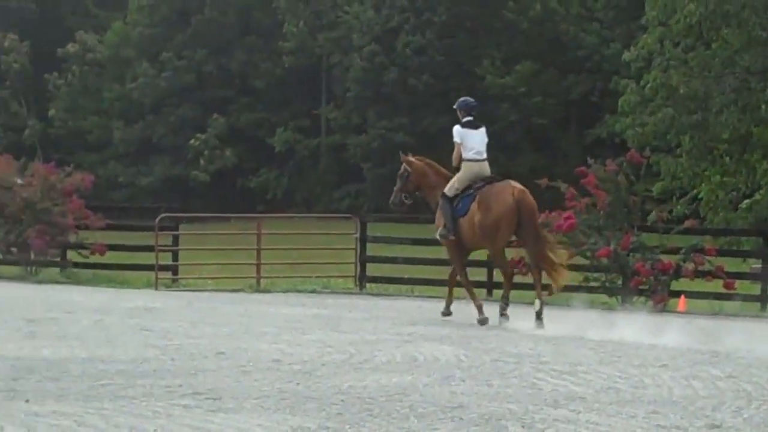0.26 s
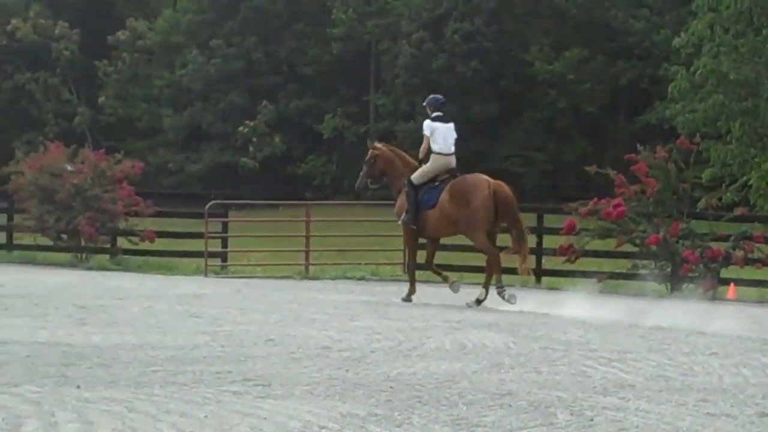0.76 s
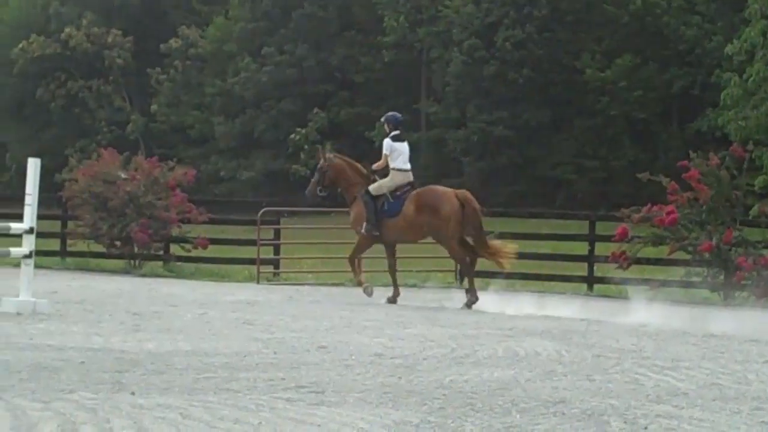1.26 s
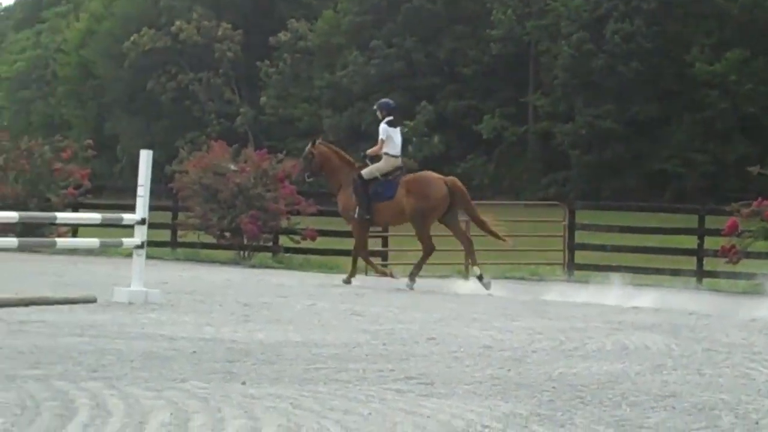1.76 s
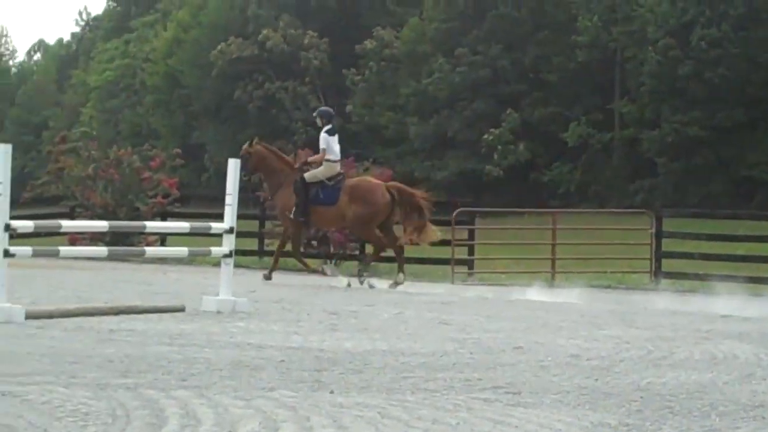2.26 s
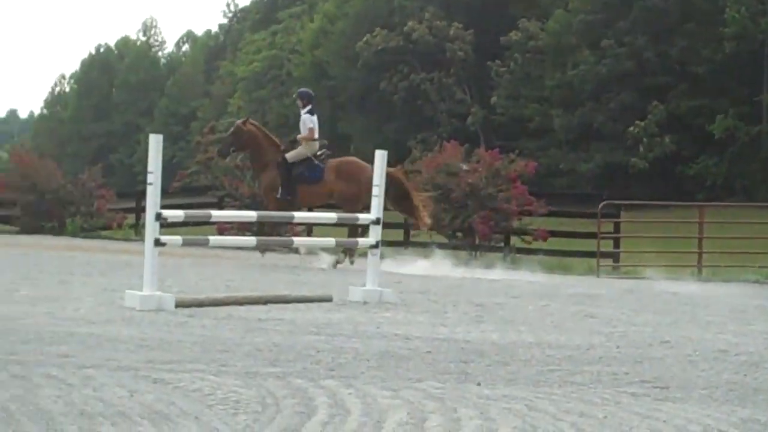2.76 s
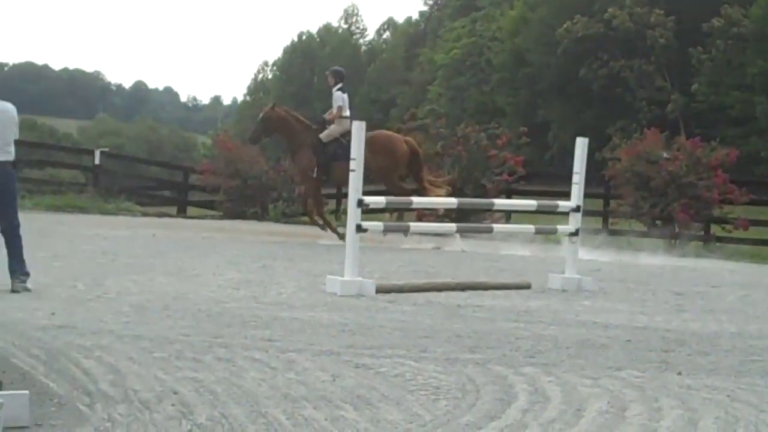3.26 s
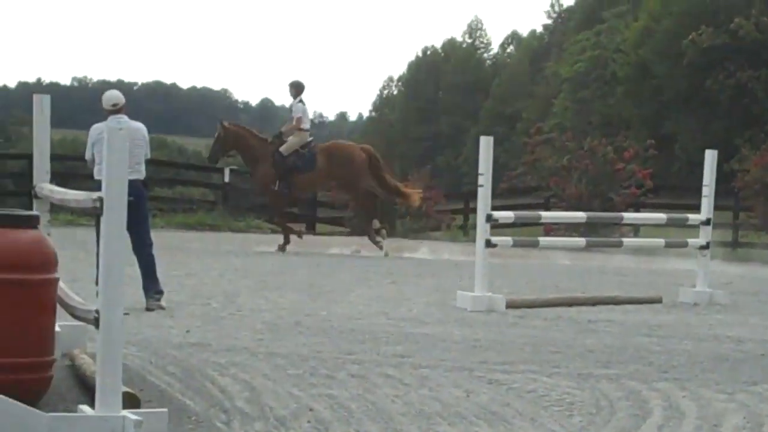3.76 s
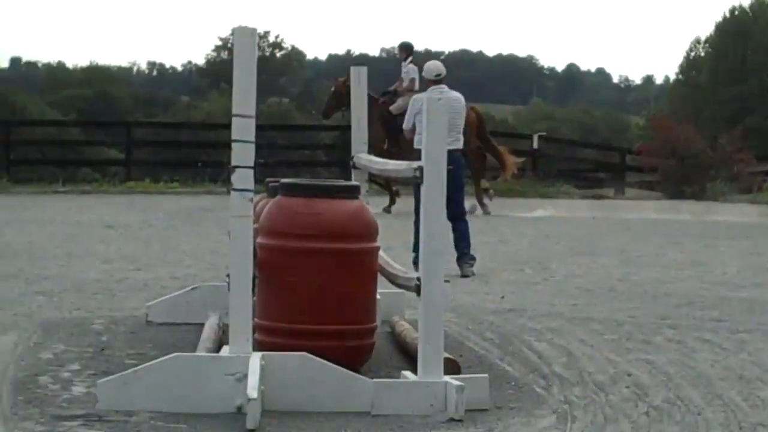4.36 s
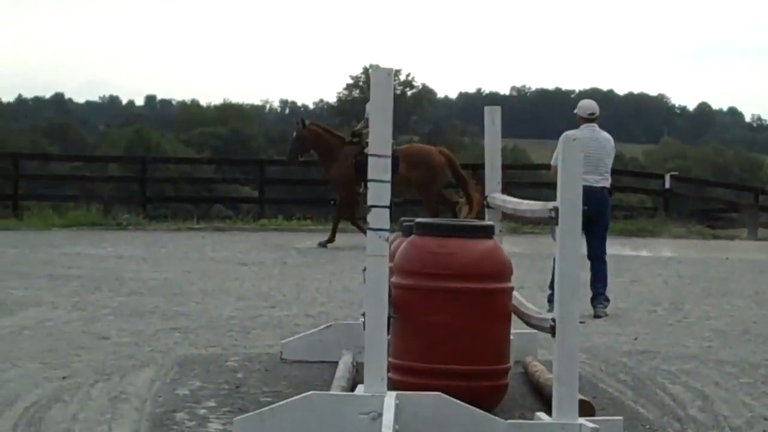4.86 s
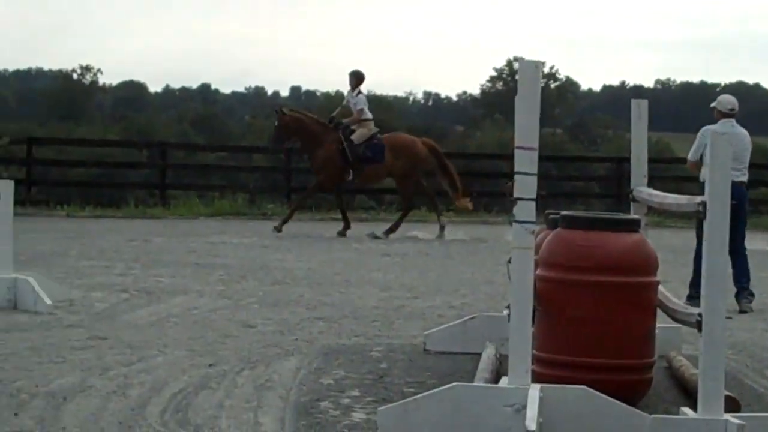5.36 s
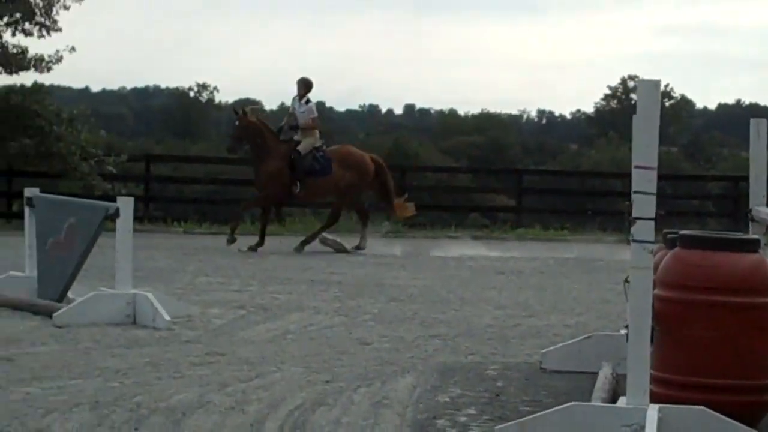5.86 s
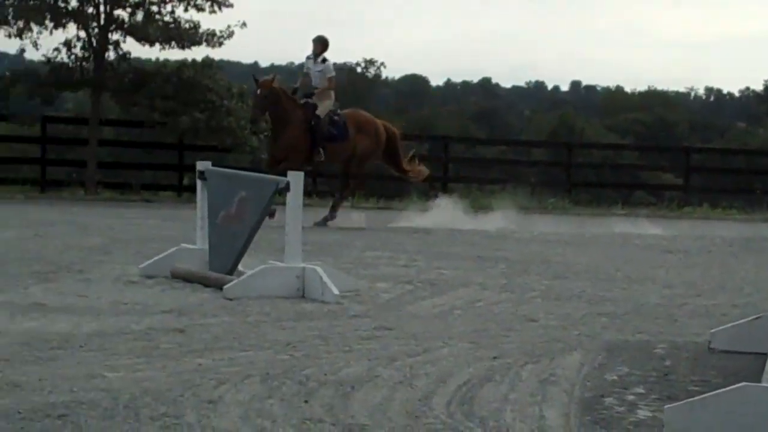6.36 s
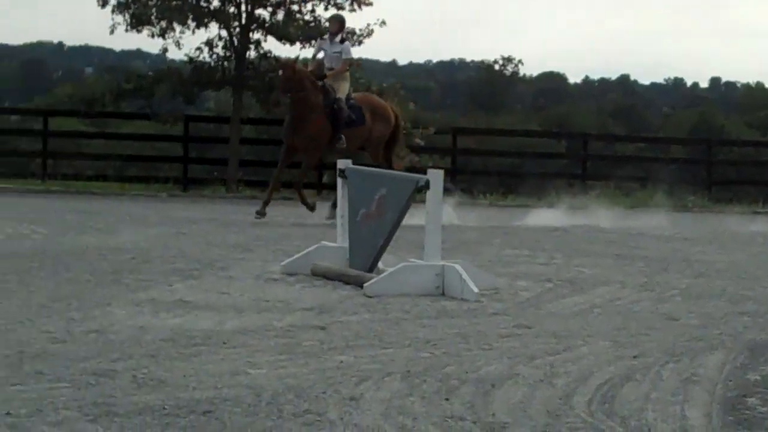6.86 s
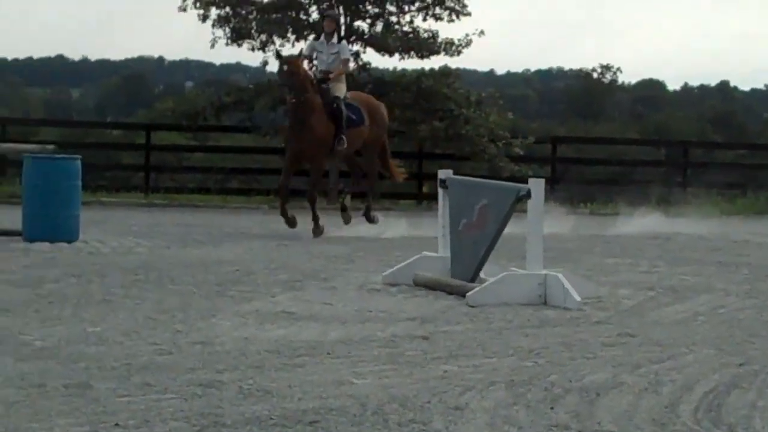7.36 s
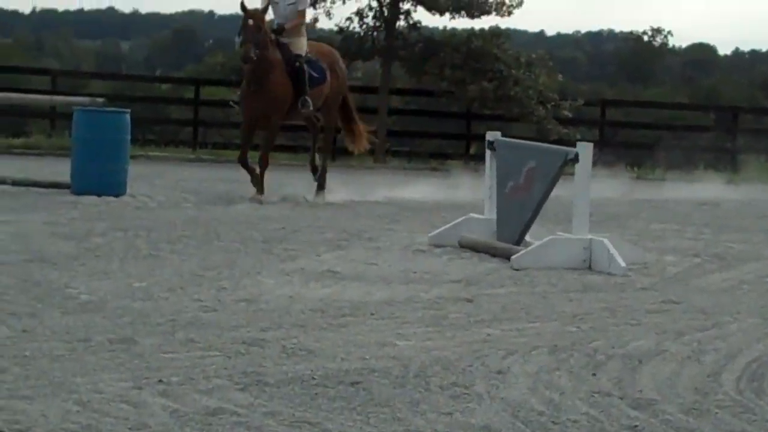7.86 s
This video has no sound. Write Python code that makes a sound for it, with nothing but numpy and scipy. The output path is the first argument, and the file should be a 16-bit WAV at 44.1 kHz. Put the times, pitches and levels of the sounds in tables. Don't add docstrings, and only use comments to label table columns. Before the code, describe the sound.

A distant horse crosses sand and gravel with quiet, irregular hoofbeats, small stone ticks and soft sprays of grit. High insect hiss and thin cricket chirps stay constant over dull far-off noise and a faint low motor hum. One startlingly sharp pebble crack comes at the middle, weaker clicks two seconds later, then a short leather squeak. Open-air stereo pickup with little puffs of wind on the microphone.

```python
import sys
import numpy as np
from scipy import signal
from scipy.fft import rfft, irfft, next_fast_len
from scipy.io import wavfile
from scipy.ndimage import map_coordinates

SR = 44100
rng = np.random.default_rng(int(sys.argv[2]) if len(sys.argv) > 2 else 0)


def pcm_store(signal):
    levels = np.round(np.clip(np.atleast_2d(signal), -1, 1) * 32767)
    wavfile.write(sys.argv[1], SR, levels.astype(np.int16).T)


def ratio_of_db(decibels):
    return 10 ** (np.asarray(decibels, float) / 20)


N = 357827
TIME = np.arange(N) / SR
TOP_HZ = 14190


def unit(x):
    return x / np.sqrt(np.mean(x ** 2) + 1e-20)


def along(points, hz):
    f, v = np.transpose(points)
    return np.interp(np.log(hz + 1), np.log(f + 1), v)


def wobble(rate):
    return map_coordinates(rng.standard_normal(int(N * rate / SR) + 4), [np.arange(N) * rate / SR])


def filtered(x, response):
    m = next_fast_len(N + SR // 2, True)
    return irfft(rfft(x, m) * response(np.fft.rfftfreq(m, 1 / SR)), m)[..., :N]


def ring(f, hz, width_hz):
    return 1j * f * width_hz / (hz * hz - f * f + 1j * f * width_hz)


# f/Hz, left-right likeness/1
LIKENESS = [(30, -0.36), (60, 0.56), (120, 0.73), (700, 0.48), (2000, 0.38), (3500, 0.08), (4300, -0.37),
            (7500, -0.31), (9000, 0.04)]


def rush(gain):
    def turn(hz):
        return np.arccos(np.clip(along(LIKENESS, hz), -1, 1)) / 2

    noise = rng.standard_normal((2, N))
    mid, side = filtered(noise, lambda hz: [np.cos(turn(hz)), np.sin(turn(hz))])
    return unit(filtered(np.array([mid + side, mid - side]), gain))


def add(track, s, sound):
    part = track[..., round(s * SR):][..., :sound.shape[-1]]
    part += sound[..., :part.shape[-1]]


def tilted(noise, db_per_octave, low_hz):
    hz = np.fft.rfftfreq(noise.shape[-1], 1 / SR) + 1
    gain = ratio_of_db(db_per_octave * np.log2(hz / 2400))
    gain = gain / (1 + (low_hz / hz) ** 4) / np.sqrt(1 + (hz / 11000) ** 4)
    return irfft(rfft(noise) * gain, noise.shape[-1])


def echoes(x, t60, gap):
    t = np.arange(SR // 3) / SR
    tail = rng.standard_normal((2, len(t))) * ratio_of_db(-60 * t / t60) * (t > gap)
    return signal.fftconvolve(np.atleast_2d(x), tail / np.linalg.norm(tail[0]), axes=1)[:, :N]


def blows(rows, t60, rise, trim_db, rough, ratio=1):
    usual_db, shorter_per_db = -46.5, 0.07
    out, t = np.zeros(N), np.arange(SR // 8) / SR
    for s, db, hz in rows:
        walk = np.cumsum(rng.standard_normal(len(t)))
        shake = rough * walk / np.sqrt(SR / (ratio * hz))
        fall_db = 60 * t / t60 * np.exp(shorter_per_db * (db - usual_db))
        envelope = ratio_of_db(db + trim_db - fall_db) * (1 - np.exp(-t / rise)) ** 2
        add(out, s, envelope * np.sin(2 * np.pi * ratio * hz * t + shake))
    return out


# f/Hz, spectral level/dB per Hz
FAR_NOISE = [(15, -38), (25, -53.5), (64, -6), (119, 0.5), (228, -1.5), (349, -8.5), (666, -4), (1390, -6),
             (1660, -5), (3110, -4.5), (3720, -5.5), (4250, -0.5), (5200, -8), (6760, -92), (11400, -120)]
# t/s, level/dB
MOTOR_LOAD = [(0, -71.5), (1.1, -78), (2.4, -66.5), (3.0, -74), (3.5, -67.5), (3.9, -92), (5.6, -68),
              (6.9, -76.5), (7.3, -71), (8.11, -67.5)]
# t/s, level over the breeze/dB
WIND_PUFFS = [(.18, 11.5), (1.1, 12), (1.5, 8), (6.1, 11), (6.7, 3), (7.77, 15)]


def outdoors():
    lull_db = -1.5 * np.exp(-((TIME - 4.93) / 0.59) ** 2)
    air = ratio_of_db(-58.5 + lull_db + 1.3 * wobble(9)) * rush(lambda f: ratio_of_db(along(FAR_NOISE, f)))

    motor_db = np.interp(TIME, *np.transpose(MOTOR_LOAD)) + 0.81 * wobble(3.77) - 0.5
    motor = ratio_of_db(motor_db) * rush(lambda f: abs(ring(f, 108.8, 21)) ** 2)

    breeze_db = -77.5 + 12 * np.exp(-TIME / 0.77) + wobble(2.4)
    for s, db in WIND_PUFFS:
        breeze_db += db * np.exp(-((TIME - s) / 0.094) ** 2)
    lumps = ratio_of_db(1.5 * np.array([wobble(7.3), wobble(8)]))
    rumble = filtered(rng.standard_normal((2, N)), lambda f: f / (f + 15) / (1 + (f / 60) ** 3))
    return air + motor + ratio_of_db(breeze_db) * unit(lumps * rumble)


# f/Hz, spectral level/dB per Hz
LEFT_CHORUS = [(4000, -16), (5200, -14), (5700, -8.5), (6400, 5), (6800, 4.5), (7200, 10.5), (7600, 11),
               (8200, 0), (9000, -3), (9900, -15.5), (10800, -10.5), (14000, -4.5)]
RIGHT_CHORUS = [(4000, -17), (5200, -15.5), (5700, -2), (6250, 9), (6700, 3), (7050, 8), (7600, 5.5),
                (8000, -6), (8700, -34), (9300, -62), (14000, -51)]
CRICKET_DB = -55.5


def cicadas():
    buzz_db = [0.88 * wobble(220) + 0.28 * wobble(25) + 0.5 * wobble(6.9) for _ in range(2)]
    hiss = rush(lambda f: ratio_of_db([along(LEFT_CHORUS, f), along(RIGHT_CHORUS, f)]))
    level_db = -47 + 2 * np.exp(-TIME / 1.4)
    return ratio_of_db(level_db) * unit(ratio_of_db(np.array(buzz_db)) * hiss)


def crickets():
    trill_phase = 2 * np.pi * np.cumsum(16.0 + 0.55 * wobble(2.0)) / SR
    depth_db = (2.0 + 0.46 * TIME) * (1 + .5 * wobble(2.0))
    trill_db = depth_db * np.sin(trill_phase) + 1.1 * wobble(40)
    near = unit(ratio_of_db(0.87 * trill_db) * rush(lambda f: abs(ring(f, 4245, 300)) ** 2))
    far = ratio_of_db(1.8 - 0.65 * TIME) * rush(lambda f: abs(ring(f, 4443, 610)) ** 2)
    return ratio_of_db(CRICKET_DB - 3.5 + 0.38 * wobble(1.15)) * (0.82 * near + 0.95 * far)


# t/s, level over the chorus/dB, f/Hz
WING_STROKES = [(1.095, 3, 4700), (1.151, 3, 4600), (1.471, 8, 4160), (1.532, 7, 4180), (1.587, 3, 4570),
                (1.647, 4, 4620), (1.708, 6, 4580), (1.981, 7, 4260), (2.052, 5, 4300), (2.996, 4, 4150),
                (3.249, 5, 4060), (4.119, 7.5, 4300), (4.46, 5, 4250), (4.76, 6, 4230), (4.82, 2, 4200),
                (4.878, 8, 4180), (5.585, 7, 4230), (5.631, 7, 4270), (5.685, 5, 4270), (6, 0, 4270),
                (6.049, 6.5, 4190), (6.102, 8, 4270), (6.581, 7, 4220), (6.639, 9, 4250), (6.75, 1, 4750),
                (6.8, 1, 4750), (6.95, 5, 4230), (6.997, 7, 4270), (7.047, 7, 4180), (7.36, 7, 4180),
                (7.418, 9, 4240), (7.452, 3, 4750), (7.473, 7, 4220), (7.502, 4, 4800), (7.793, 7.5, 4220),
                (7.839, 10, 4270), (7.867, 1, 4700), (7.898, 9, 4240), (8.032, 8, 4220)]


def wings():
    half_s, port_phase_rad = 0.0073, 1.32
    out, t = np.zeros((2, N)), np.arange(-SR // 25, SR // 25) / SR
    for s, db, hz in WING_STROKES:
        shake = .05 * np.cumsum(rng.standard_normal(len(t))) + np.array([[0], [port_phase_rad]])
        swell = ratio_of_db(CRICKET_DB + db) * np.exp(-(t / half_s) ** 2)
        add(out, s + t[0], swell * np.sin(2 * np.pi * hz * t + shake))
    return out


# t/s, length/s, first slip rate/Hz, last slip rate/Hz, level/dB
PULLS = [
    (6.305, 0.016, 388, 330, -64),
    (6.3264, 0.051, 300.6, 124.2, -55.5),
    (6.391, .002, 60, 60, -49),
    (6.405, .008, 156, 156, -52),
    (6.426, .121, 224, 160.4, -53.5),
    (6.555, .002, 60, 60, -48),
    (6.6248, 0.073, 197, 151, -54),
]
# f/Hz, width/Hz, level/dB
LEATHER_MODES = [(1160, 126, 4), (1784, 310, 6.5), (2240, 300, -3.5), (2980, 520, 7)]


def strap():
    slips = np.zeros(N)
    for s, length, first, last, db in PULLS:
        u = np.arange(round(length * SR)) / SR
        turns = np.floor(first * u + (last - first) * u * u / (2 * length))
        grip_db = -6 * np.exp(-u / .008)
        jerk_db = 6 * np.exp(-((u - .02) / .016) ** 2)
        let_go_db = -4 * (u / length) ** 6
        force_db = db + grip_db + jerk_db + let_go_db + 30 + .7 * rng.standard_normal(len(u))
        add(slips, s, np.diff(turns, prepend=-1) * ratio_of_db(force_db))

    modes = []
    for k, (hz, width, db) in enumerate(LEATHER_MODES):
        gain = (-1) ** k * ratio_of_db(db)
        modes.append(filtered(slips, lambda f: gain * ring(f, hz, width) * ring(f, hz, 2 * width)))
    tight_db = 0.5 - 33 * np.exp(-np.abs(TIME - PULLS[0][0]) / 0.022)
    dry = modes[0] * ratio_of_db(-.5 * tight_db) + modes[1] + (modes[2] + modes[3]) * ratio_of_db(tight_db)
    return dry + ratio_of_db(-11) * echoes(dry, t60=.1, gap=0.0019)


# t/s, peak level/dB, left-right level/dB, t60/s, brightness/dB per octave
PEBBLE_HITS = [
    (4.0083, -3, 1.5, 0.016, 6.5),
    (4.0124, -16.5, 2, .02, -2.5),
    (4.0244, -25, -17, .01, 9),
    (4.0617, -16.5, 13, 0.015, 8),
    (4.063, -24, 8, .01, 10.5),
    (5.335, -36, 9, 0.023, 15.5),
    (5.9586, -21, 7, .015, 7),
    (5.961, -18, 7, 0.03, 7),
    (5.9645, -23, 4, .015, 7),
    (5.9963, -39, 0, .02, 2),
]
# f/Hz, level/dB, t60/s
POLE_MODES = [(3400, -5.5, 0.009), (4040, -11.5, 0.019), (1860, -17, 0.014), (6507, -9, 0.012)]


def pebbles():
    out, t = np.zeros((2, N)), np.arange(SR // 20) / SR
    for s, db, pan_db, t60, tilt_db in PEBBLE_HITS:
        snap = np.exp(-((t - .0007) / 0.00015) ** 2) * np.sin(2 * np.pi * 6800 * t)
        pole = np.zeros(len(t))
        for hz, level, ring_s in POLE_MODES:
            pole += ratio_of_db(level - tilt_db - 60 * t / ring_s) * np.sin(2 * np.pi * hz * t)
        pole *= 1 - np.exp(-t / 0.00016)
        rattle = 0.09 * rng.standard_normal((2, len(t))) * ratio_of_db(-60 * t / t60) * (t > .0004)
        rattle[:, 20] += .8
        rattle = tilted(rattle, tilt_db, low_hz=1500) * (t > .0002) * (t < .04)
        pan = np.array([[.5], [-.5]]) * pan_db
        add(out, s - .0004, ratio_of_db(db - 10 + pan) * (snap + pole + rattle))
    return out


def scuffs():
    coarse = np.arange(0, N, 256) / SR
    near_kick = sum(np.exp(-((coarse - s) / 0.075) ** 2) for s, *_ in SAND_KICKS + TOE_CLIPS)
    busy = np.interp(TIME, coarse, near_kick)
    clumps = ratio_of_db(3.7 * wobble(45) + 0.64 * wobble(200))
    grains = rush(lambda f: abs(ring(f, 707, 940)) ** 2 + 1.42 * abs(ring(f, 258, 87)))
    return ratio_of_db(-65 + 3 * np.tanh(0.54 * busy)) * unit(clumps * grains)


# t/s, peak level/dB, t60/s
SAND_KICKS = [(0.1903, -47, 0.16), (0.2994, -46, 0.045), (0.4783, -47.5, 0.064), (0.5841, -47.5, 0.074),
              (0.853, -49.5, 0.066), (0.9366, -49.5, 0.14), (1.04, -45, 0.06), (1.6781, -48.5, 0.082),
              (1.85, -51.5, 0.075), (2.0342, -52, 0.096), (2.5182, -45, 0.045), (2.5594, -51.5, 0.15),
              (3.1228, -51, 0.11), (3.271, -47, 0.14), (5.0584, -54, 0.12), (5.5094, -41.5, 0.052),
              (5.6585, -47, 0.13), (5.9712, -44.5, 0.11), (6.0955, -48.5, 0.18), (6.171, -49, 0.18),
              (6.2572, -56, 0.035), (6.575, -45, 0.14), (6.987, -53, 0.047), (7.2579, -48, 0.1),
              (7.396, -47.5, 0.06), (7.4872, -49, 0.029), (7.689, -45, 0.13), (7.8336, -45, 0.12),
              (7.9394, -47.5, 0.26), (8.0621, -48.5, 0.11)]
# t/s, peak level/dB
TOE_BRUSHES = [(0.0872, -50.5), (0.246, -57), (2.55, -50), (3.73, -54), (1.1205, -50), (1.1997, -50),
               (2.607, -48), (3.338, -54), (4.1193, -53), (5.167, -57), (5.739, -62), (7.204, -54),
               (7.3127, -50), (7.8968, -49)]


def sand():
    puff_t60 = 0.11
    clumps = []
    for s, db, t60 in SAND_KICKS:
        clumps.append((s, db, t60, -2 - 1.5 * np.log2(t60 / puff_t60)))
    clumps += [(s, -53, puff_t60, -2.5) for s, *_ in LANDINGS + HOLLOW_ROLLS[2:]]
    clumps += [(s, db, 0.091, -1.5) for s, db in TOE_BRUSHES]

    out, t = np.zeros((2, N)), np.arange(SR // 4) / SR
    for s, db, t60, tilt_db in clumps:
        grains = rng.standard_normal((3, len(t))) * ratio_of_db(2.4 * rng.standard_normal(len(t)))
        pair = tilted(unit(grains[0] + 0.17 * grains[1:]), tilt_db, low_hz=565)
        envelope = ratio_of_db(db + 12.0 - 60 * t / t60) * (1 - np.exp(-t / (0.15 * t60)))
        add(out, s - .003, envelope * pair)
    return out


# t/s, peak level/dB, f/Hz
STONE_TICKS = [(0.2457, -48, 1670), (0.299, -48, 1650), (2.5182, -65, 1580), (2.5606, -43, 3160),
               (3.27, -47, 2910), (5.1662, -50, 2620), (5.508, -48, 2190), (5.7374, -49, 1650),
               (5.9578, -35, 2380), (6.2572, -48, 2460), (6.9871, -50, 1590), (7.203, -51, 1970),
               (7.3128, -44, 3100), (7.4865, -47, 3120), (7.4861, -39, 1750), (8.0623, -38, 1860),
               (8.063, -44, 2950)]


def stones():
    t60 = 0.03
    low = blows(STONE_TICKS, t60, rise=0.00045, trim_db=2, rough=1.23)
    high = blows(STONE_TICKS, .76 * t60, rise=0.00027, trim_db=1, rough=1.8, ratio=1.62)
    return low + high


# middle t/s, peak level/dB, f/Hz, half length/s
HOLLOW_ROLLS = [(1.979, -42, 245, .007), (2.519, -41, 230, .007), (3.686, -39, 285, .009),
                (4.311, -39, 262, .012), (4.902, -48, 290, .009), (7.762, -45, 290, .009)]


def booms():
    out, t = np.zeros(N), np.arange(-SR // 20, SR // 20) / SR
    for s, db, hz, half in HOLLOW_ROLLS:
        shake = .012 * np.cumsum(rng.standard_normal(len(t)))
        add(out, s + t[0], ratio_of_db(db) * np.exp(-(t / half) ** 2) * np.sin(2 * np.pi * hz * t + shake))
    return out


# t/s, peak level/dB, f/Hz
LANDINGS = [(0.559, -54, 253), (0.942, -59, 263), (1.331, -49, 245), (1.695, -68, 310), (1.973, -40, 248),
            (2.513, -38, 180), (2.728, -57, 280), (2.971, -57, 274), (3.098, -46, 238), (3.154, -50, 260),
            (4.221, -58, 233), (4.273, -43.5, 199), (4.345, -55, 157), (4.428, -56, 218), (4.808, -50, 203),
            (4.94, -52, 181), (5.363, -49, 204), (5.466, -56, 225), (5.627, -47, 254), (6.037, -57, 190),
            (6.578, -50, 282), (6.684, -43, 215), (6.729, -45, 297), (7.157, -45, 264), (7.249, -53, 220),
            (7.331, -51, 224), (7.833, -44, 210)]
# t/s, peak level/dB, f/Hz
LIGHT_LANDINGS = [(0.193, -67, 176), (0.291, -64, 235), (0.675, -64, 297), (2.037, -70, 350),
                  (2.518, -61, 312), (3.82, -62, 160), (3.885, -66, 271), (5.022, -58, 226),
                  (5.939, -67, 257), (6.168, -63, 132), (7.159, -45, 346), (7.482, -62, 315),
                  (7.687, -66, 143), (7.92, -57, 265), (7.13, -54, 220), (7.189, -56, 252),
                  (4.47, -63, 231), (7.786, -52, 115)]
# t/s, peak level/dB, f/Hz
HOOF_KNOCKS = [(0.585, -46.5, 600), (1.123, -58, 713), (1.336, -52, 663), (1.679, -54, 573),
               (1.973, -43, 627), (2.464, -55, 644), (2.737, -43, 610), (2.94, -35, 730), (2.979, -46, 627),
               (3.105, -46, 600), (3.161, -44, 670), (3.261, -49, 680), (3.507, -51, 768),
               (3.685, -39, 696), (3.726, -52, 756), (3.742, -44, 635), (4.64, -59, 585), (4.958, -56, 540),
               (6.256, -54, 1240), (3.832, -43, 757), (4.0082, -37, 656), (4.08, -49, 734),
               (4.227, -60, 686), (4.344, -48, 626), (4.457, -53, 635), (5.027, -48, 695),
               (5.631, -29, 615), (5.957, -40, 663), (6.097, -53, 600), (6.257, -52, 648),
               (6.581, -54, 620), (6.817, -47, 686), (7.163, -51, 472), (7.923, -36, 780)]
# t/s, peak level/dB, f/Hz
TOE_CLIPS = [(0.174, -57, 1160), (0.302, -57, 1080), (1.233, -56, 1110), (2.04, -63, 1220),
             (2.156, -38, 880), (2.258, -50, 980), (2.43, -52, 890), (2.518, -30, 955), (2.519, -44, 680),
             (2.52, -48, 1420), (2.908, -49, 824), (3.462, -54, 930), (3.897, -45, 1070),
             (5.469, -61, 1070), (5.66, -40, 670), (5.691, -45, 1050), (5.715, -60, 630),
             (6.174, -49, 1120), (6.735, -42, 1040), (2.748, -46, 930), (5.675, -54, 1160),
             (5.059, -54, 1660), (7.004, -50, 820), (7.326, -55, 810), (7.407, -49, 800), (7.62, -50, 1440),
             (7.815, -50, 1160), (7.95, -51, 1230), (7.684, -51, 523), (7.753, -52, 650), (4.269, -58, 635),
             (4.946, -56, 684), (5.511, -51, 540), (6.039, -56, 746), (8.006, -46, 865)]


def hooves():
    ground_t60, hoof_t60, toe_t60 = 0.045, 0.038, 0.026
    thuds = LANDINGS + LIGHT_LANDINGS
    dry = booms()
    dry += blows(thuds, ground_t60, rise=0.0031, trim_db=-5.0, rough=0.99, ratio=0.3)
    dry += blows(thuds, ground_t60, rise=0.0026, trim_db=9.0, rough=0.36)
    for rows, t60 in (HOOF_KNOCKS, hoof_t60), (TOE_CLIPS, toe_t60):
        dry += blows(rows, 0.55 * t60, rise=0.00046, trim_db=0.0, rough=1.84, ratio=1.61)
        dry += blows(rows, t60, rise=0.00089, trim_db=5, rough=0.27)
    return dry + ratio_of_db(-8) * echoes(dry, t60=0.26, gap=0.0045)


def scene():
    background = outdoors() + cicadas() + crickets() + wings()
    cracks = pebbles()
    answer = ratio_of_db(-12.5) * echoes(cracks, t60=0.95, gap=0.014)
    horse = strap() + scuffs() + sand() + stones() + hooves()
    first = cracks * (TIME < 4.02)
    rest = background + answer + horse + cracks - first
    return first + filtered(rest, lambda f: f < TOP_HZ)


def roll_off(x):
    return signal.sosfilt(signal.butter(12, 16800, fs=SR, output="sos"), x)


# cavity f/Hz, width/Hz, shading f/Hz, gain/dB
MIC_PORTS = [(7250, 1880, 6300, 2.5), (6310, 1255, 9400, -0.5)]


def record(dry):
    def port_response(f):
        cavities = []
        for hz, width, shade_hz, db in MIC_PORTS:
            peak = hz * hz / (hz * hz - f * f + 1j * f * width)
            cavities.append(ratio_of_db(db) * peak / (1 + 1j * f / shade_hz))
        return np.array(cavities) * ratio_of_db(-.012 * np.maximum(f - TOP_HZ, 0))

    hiss = filtered(ratio_of_db(-65.0) * rng.standard_normal((2, N)), lambda f: f < TOP_HZ)
    return roll_off(filtered(dry, port_response) + hiss)


dry = scene()
out = record(dry)
pcm_store(out)
```